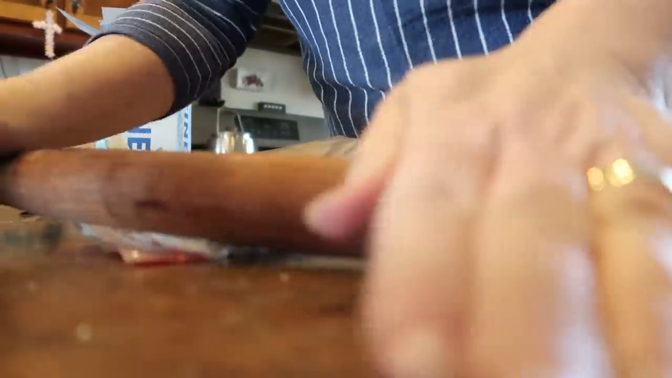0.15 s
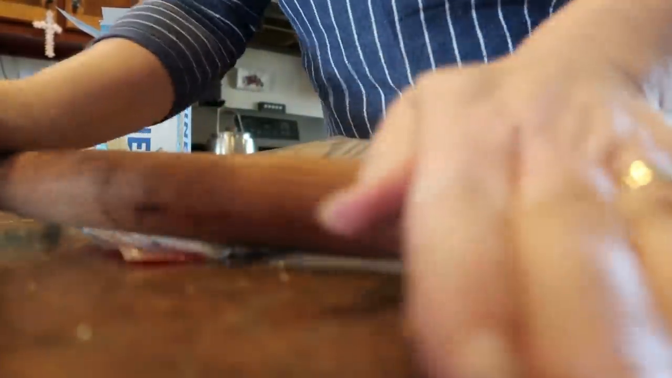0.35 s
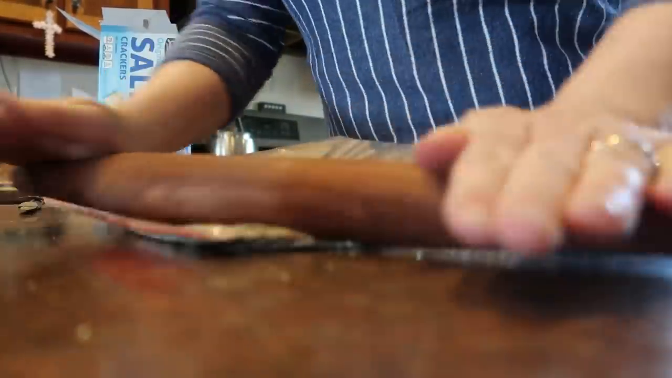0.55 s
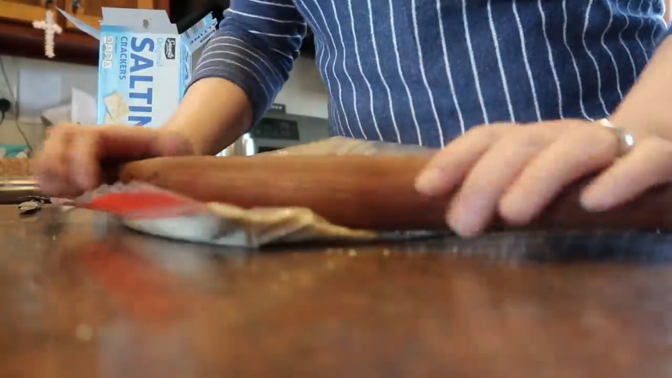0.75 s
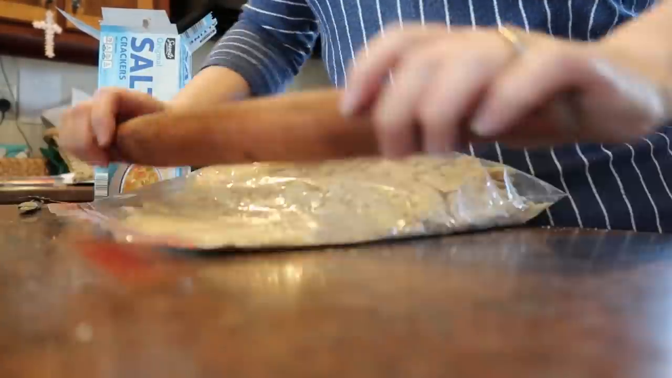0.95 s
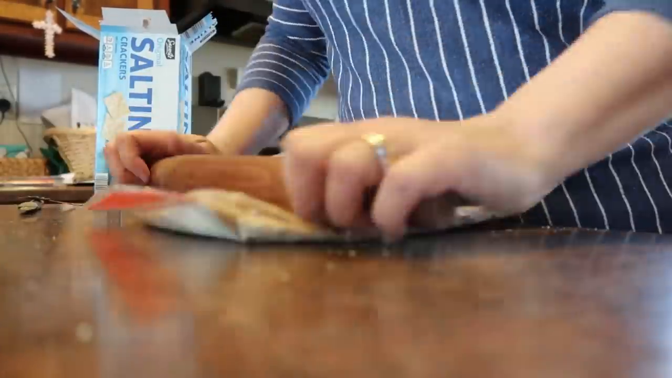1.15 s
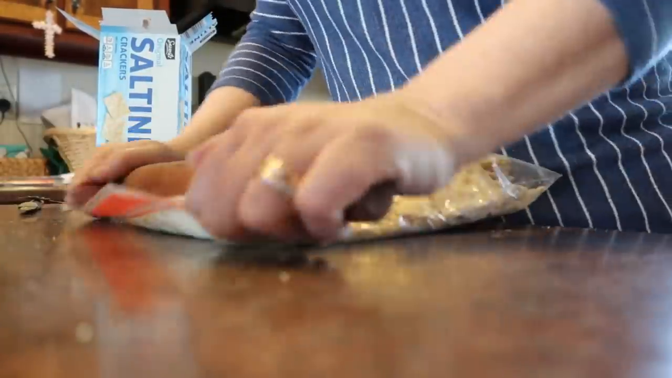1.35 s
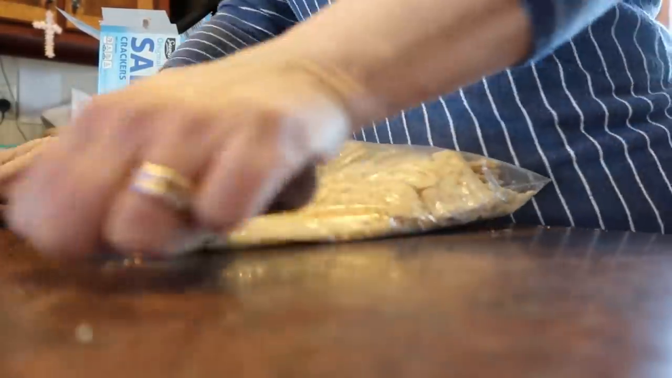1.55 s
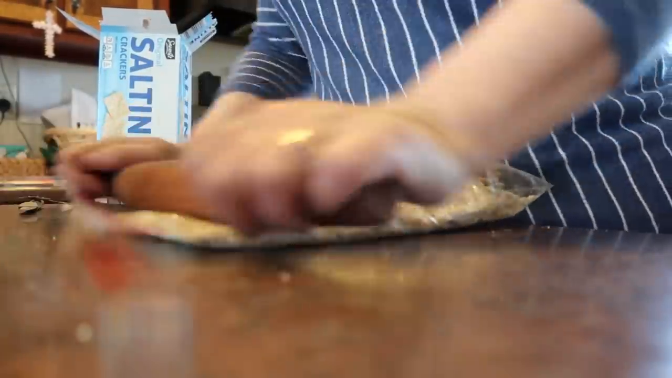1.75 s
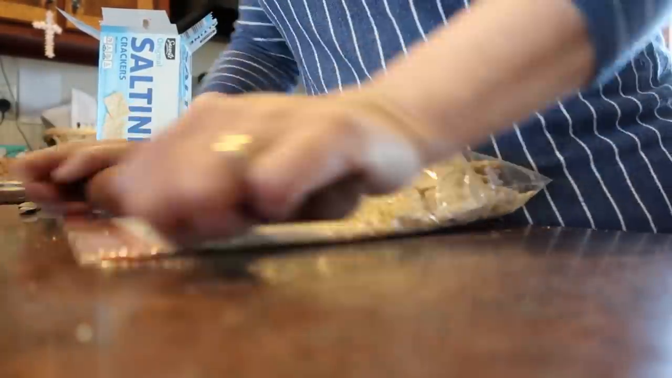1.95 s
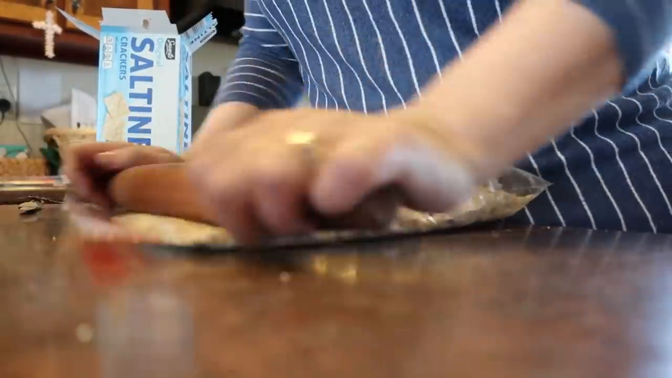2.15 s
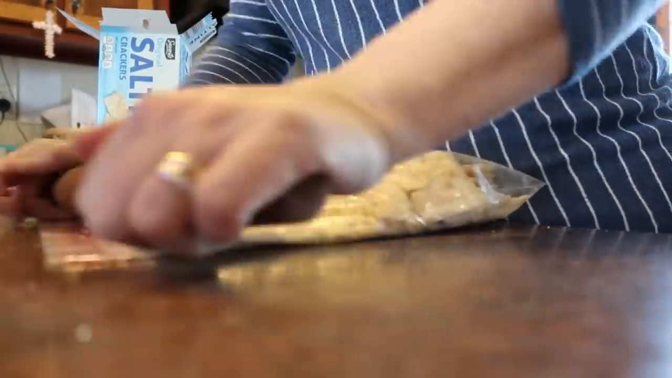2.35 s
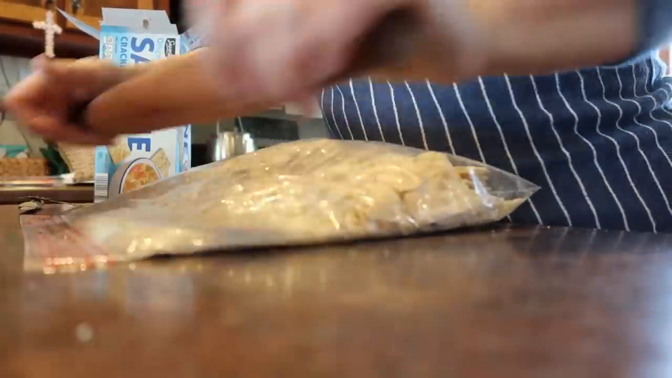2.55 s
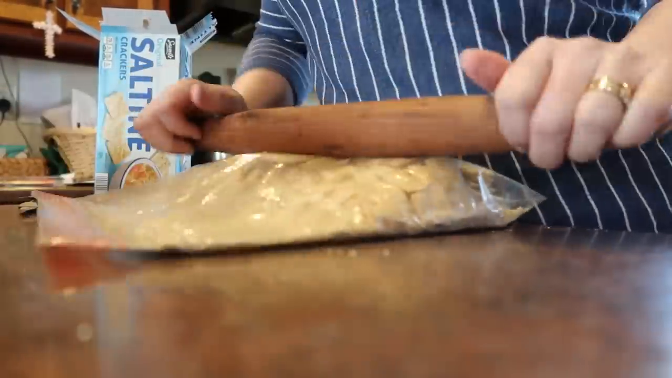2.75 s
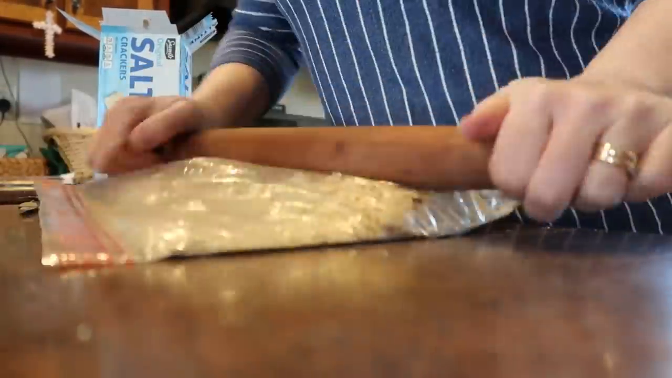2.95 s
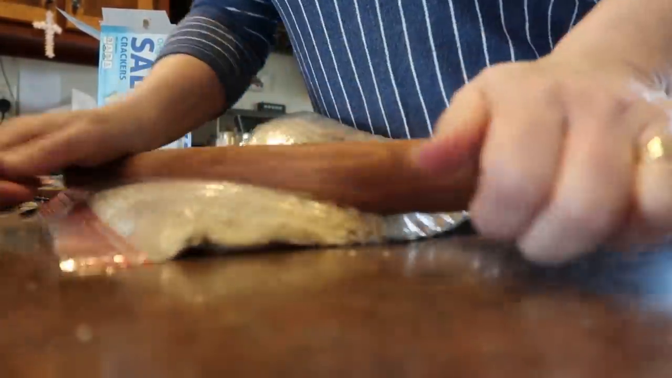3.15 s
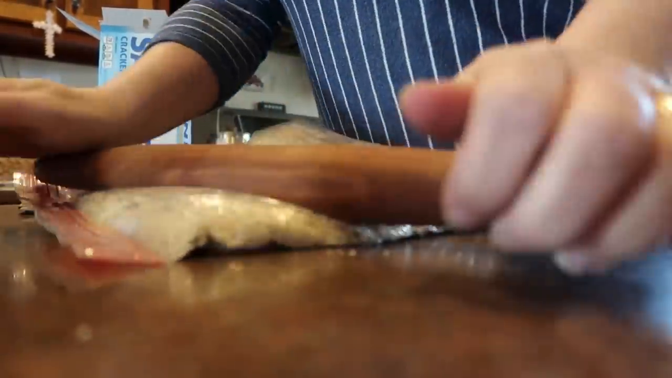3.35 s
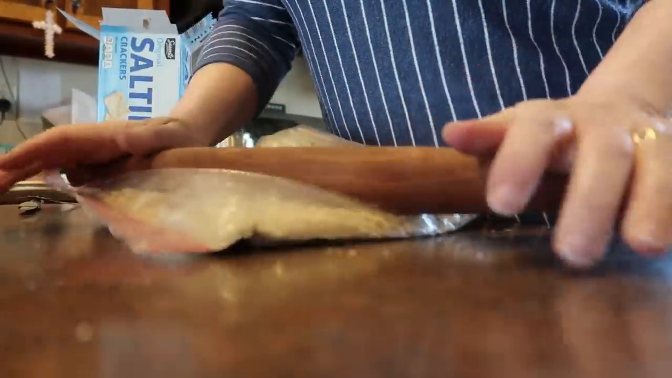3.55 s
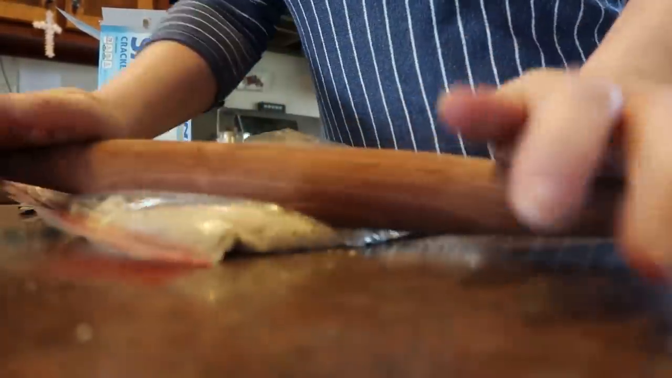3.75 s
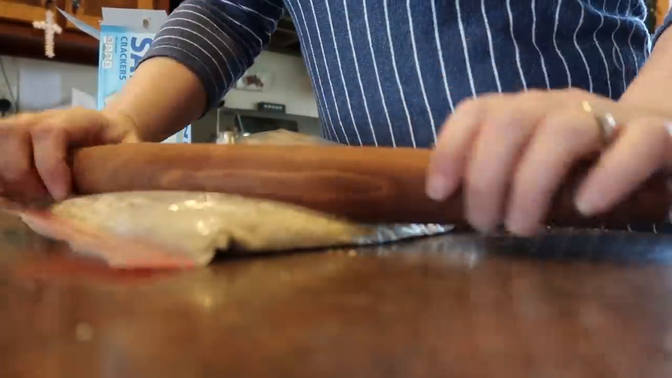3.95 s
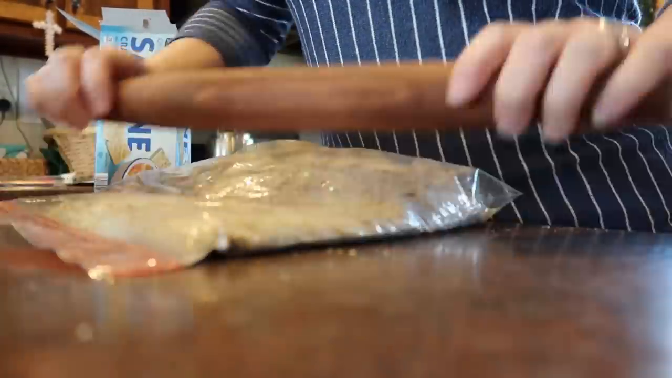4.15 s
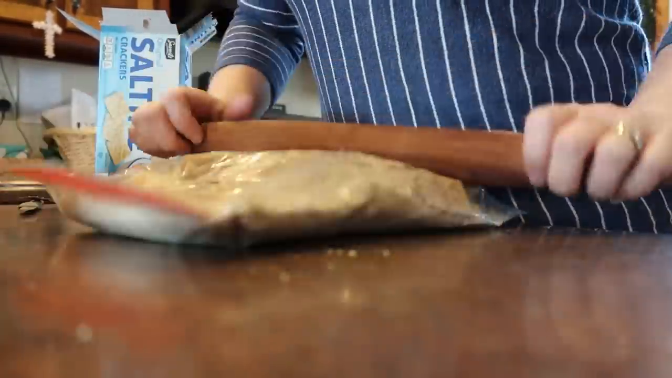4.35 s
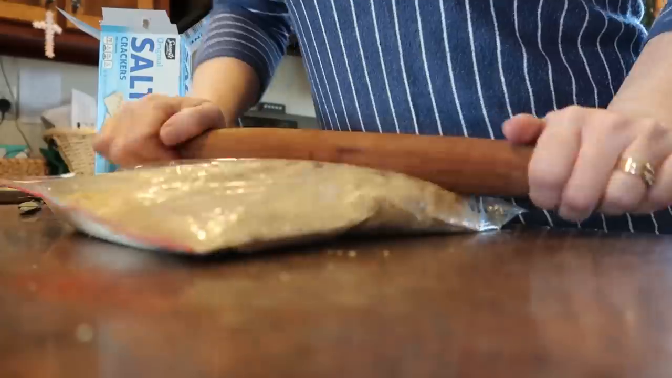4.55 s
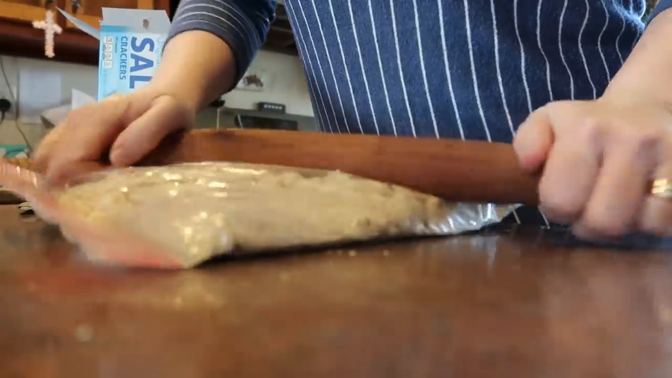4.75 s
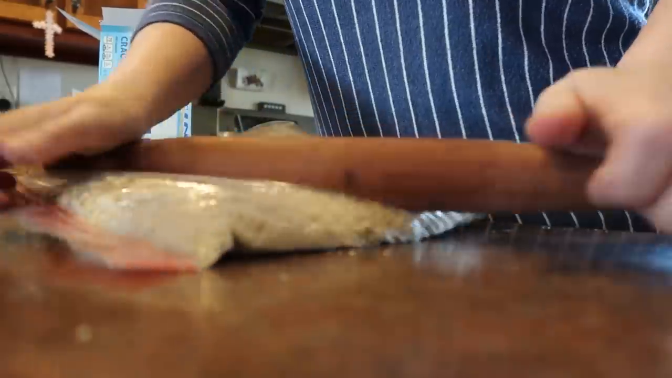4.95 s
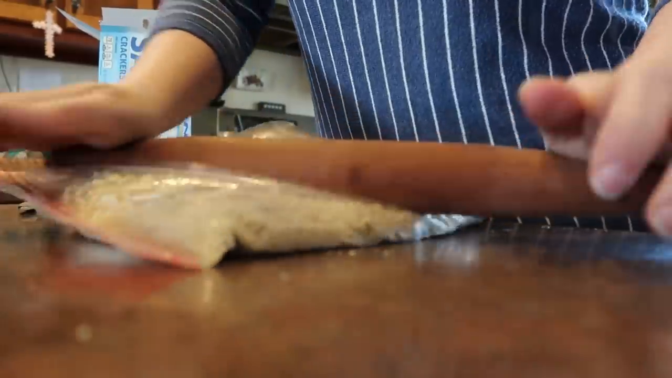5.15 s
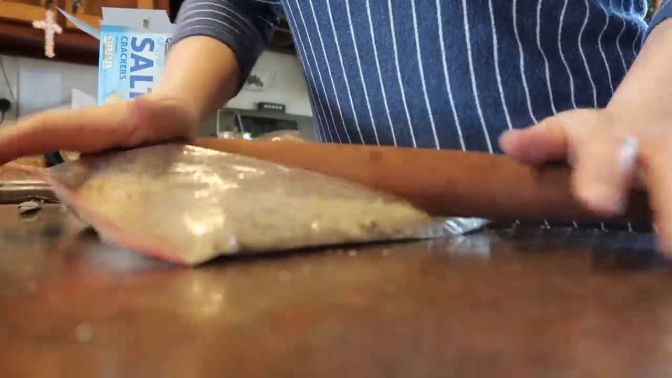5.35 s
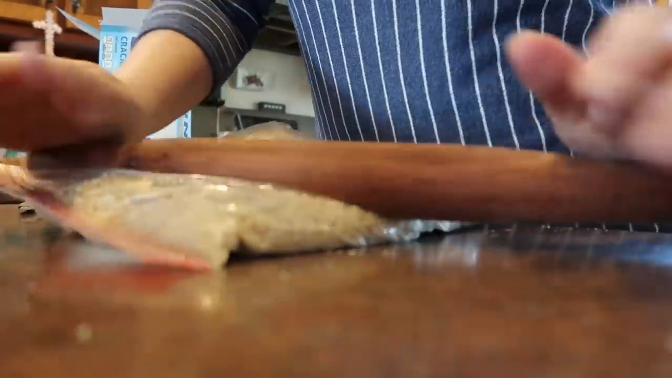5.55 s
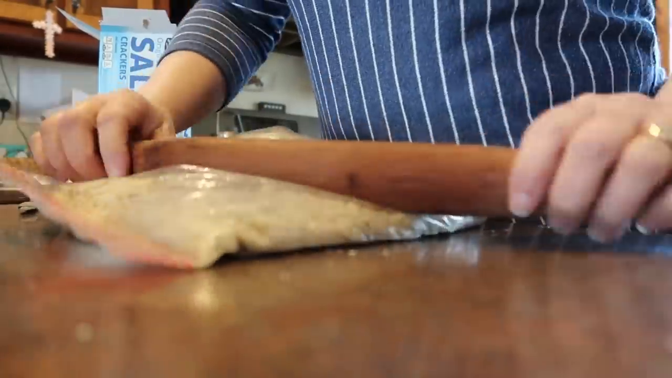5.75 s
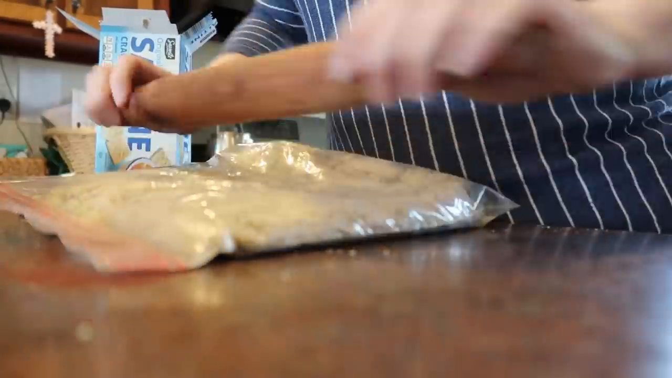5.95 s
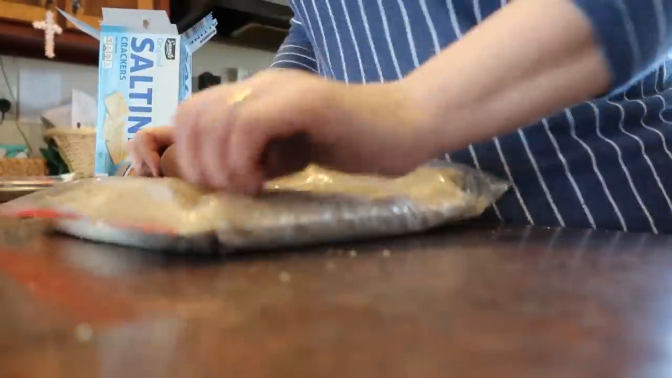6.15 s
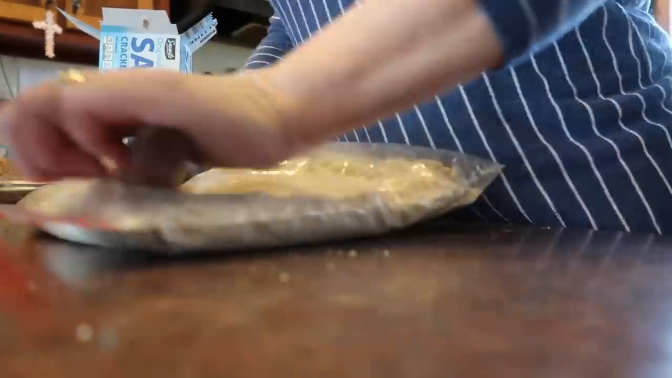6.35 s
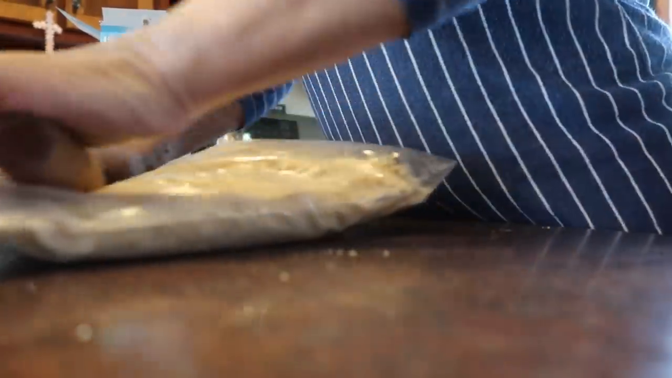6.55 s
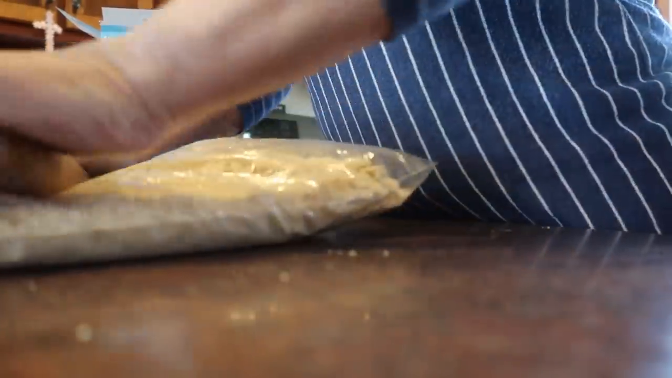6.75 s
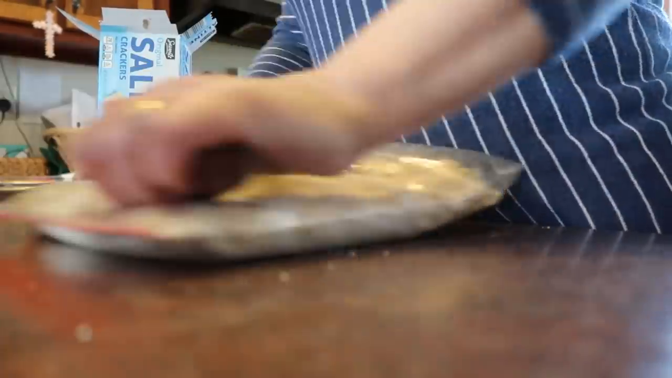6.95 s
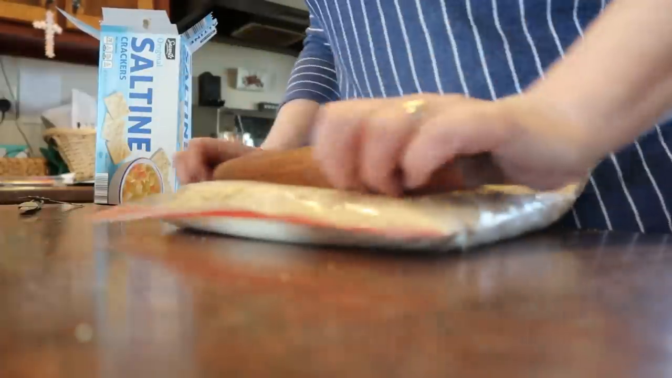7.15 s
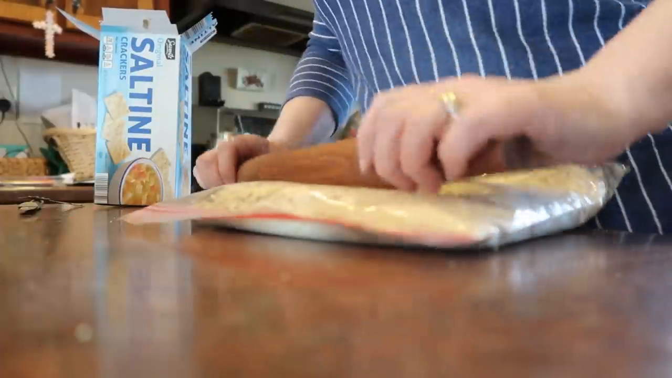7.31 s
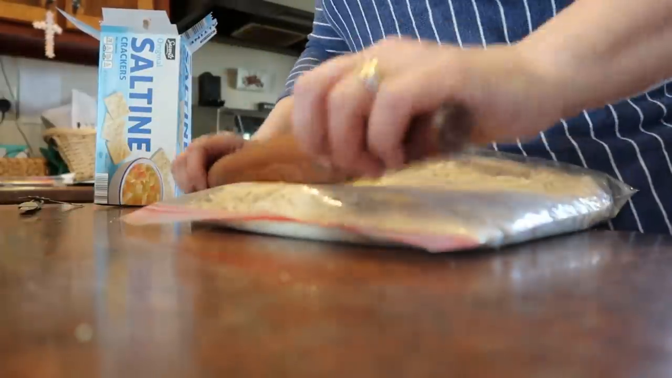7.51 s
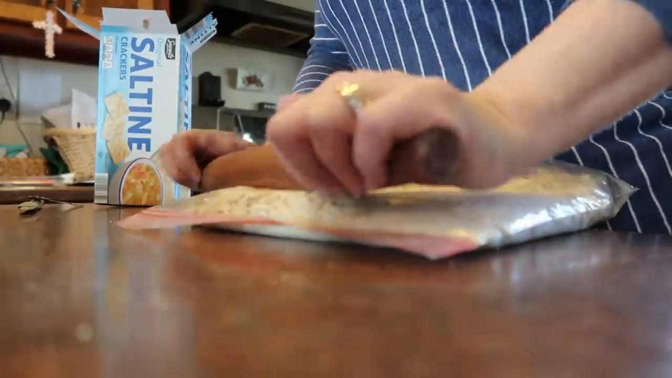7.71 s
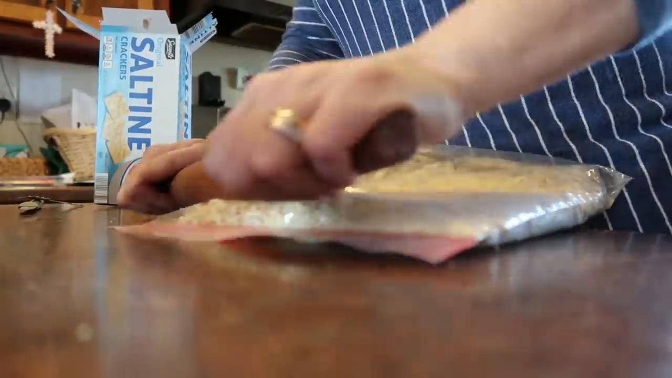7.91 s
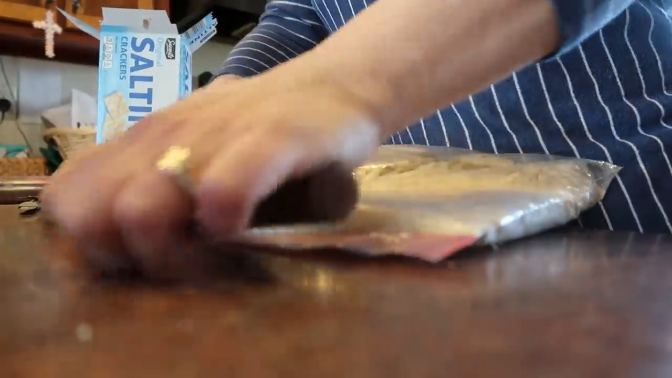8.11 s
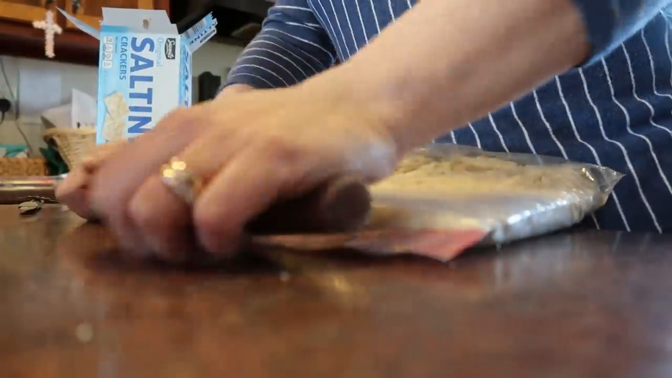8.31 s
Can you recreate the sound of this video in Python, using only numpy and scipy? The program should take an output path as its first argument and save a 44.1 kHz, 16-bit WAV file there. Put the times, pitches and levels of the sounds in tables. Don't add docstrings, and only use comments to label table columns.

```python
import sys
import numpy as np
from scipy import signal
from scipy.fft import rfft, irfft, next_fast_len
from scipy.io import wavfile

SR = 44100
rng = np.random.default_rng(int(sys.argv[2]) if len(sys.argv) > 2 else 0)


def wav_out(sig):
    wavfile.write(sys.argv[1], SR, np.round(np.clip(np.atleast_2d(sig).T, -1, 1) * 32767).astype(np.int16))


def gain_from_decibels(decibels):
    exponent = np.asarray(decibels, float) / 20
    return 10 ** exponent


N = 373923


def rms_one(x):
    return x / np.sqrt(np.mean(x ** 2) + 1e-20)


def power_db(power):
    return 10 * np.log10(power)


def in_time(rows):
    s, *columns = np.transpose(rows)
    return [np.interp(np.arange(N) / SR, s, column) for column in columns]


def colour(x, points):
    size = 4096
    hz, level_db = np.transpose(points)
    axis = np.log(np.arange(size // 2 + 1) * SR / size + 1)
    cepstrum = irfft(np.log(gain_from_decibels(np.interp(axis, np.log(hz), level_db))))
    cepstrum[1:size // 2] *= 2
    cepstrum[size // 2 + 1:] = 0
    response = irfft(np.exp(rfft(cepstrum)))
    return rms_one(signal.oaconvolve(x, response)[:N])


def steep(x, hz, kind):
    return signal.sosfilt(signal.cheby2(8, 50, hz, kind, fs=SR, output="sos"), x)


def soft_low(x, hz):
    return signal.sosfilt(signal.butter(2, hz, fs=SR, output="sos"), x)


def high_shelf(x, gain, hz):
    low = soft_low(x, hz)
    return low + gain * (x - low)


def drift(rate_hz):
    r = np.exp(-2 * np.pi * rate_hz * 20 / SR)
    noise = rng.standard_normal(N // 20 + 2002)
    slow = signal.lfilter([1], [1, -2 * r, r * r], noise)[2000:]
    return np.interp(np.arange(N) / 20, np.arange(len(slow)), rms_one(slow))


def ring(clicks, hz, t60):
    r, w = gain_from_decibels(-60 / (t60 * SR)), 2 * np.pi * hz / SR
    return signal.lfilter([0, np.sin(w)], [1, -2 * r * np.cos(w), r * r], clicks + 1e-18)


def random_signs(breaks):
    return breaks * rng.choice([-1, 1], N)


def strikes(table):
    clicks = np.full(N, 1e-18)
    rows = np.array(table)
    clicks[(rows[:, 0] * SR).astype(int)] = gain_from_decibels(rows[:, 1])
    return clicks


# frequency in Hz, level in dB per Hz.
AIR = [(18, -79), (30, -37), (75, -6), (147, -15.5), (312, -11.5), (716, -21), (859, -26.5), (3500, -26),
       (7830, -41), (8920, -11.5), (15000, -22)]
# frequency in Hz, level in dB per Hz.
AIR_APART = [(59, -26), (100, -8), (462, -9.5), (983, -20), (1630, -20), (3460, -31), (15000, -47)]
# frequency in Hz, level in dB rms.
FRIDGE_TONES = [(120.5, -53.5), (143, -53.5), (241, -57), (726, -66)]


def room_tone():
    air = colour(rng.standard_normal(N), AIR)
    shared = steep(air, 9200, "low") + gain_from_decibels(-24) * air
    apart = high_shelf(colour(rng.standard_normal(N), AIR_APART), gain_from_decibels(12), 6000)
    t = np.arange(N) / SR
    hum = 0
    for hz, db in FRIDGE_TONES:
        hum = hum + gain_from_decibels(db + 2 + 1.5 * drift(5)) * np.sin(2 * np.pi * hz * t)
    return gain_from_decibels(-41) * shared + gain_from_decibels(-59) * apart * [[1], [-1]] + hum


def moves(table, rise_db_per_s, fall_db_per_s, bulge_db=0):
    t = np.arange(0, N + 20, 20) / SR
    power = np.full(len(t), 1e-12)
    for s, length, first_db, last_db in table:
        part = np.clip((t - s) / length, 0, 1)
        level_db = first_db + (last_db - first_db) * part + bulge_db * np.sin(np.pi * part)
        level_db -= rise_db_per_s * np.maximum(s - t, 0)
        level_db -= fall_db_per_s * np.maximum(t - s - length, 0)
        power += gain_from_decibels(2 * np.maximum(level_db - 2, -120))
    return np.interp(np.arange(N) / SR, t, power)


# start in seconds, length in seconds, crunch at start in dB, crunch at end in dB.
ROLLS = [(0.0, 0.072, -27.5, -22), (.15, 0.082, -20.5, -24), (.335, 0.024, -20, -22),
         (.45, 0.069, -23.5, -34.5), (.60, 0.21, -21, -20), (1.32, 0.16, -16, -19), (1.50, .18, -17.5, -17),
         (1.80, 0.14, -30.5, -19), (2.02, .13, -20.5, -16.5), (2.25, 0.067, -20, -21.5),
         (2.40, 0.16, -18.5, -29.5), (2.93, .39, -19, -15.5), (3.33, 0.095, -23.5, -21.5),
         (3.51, 0.056, -23, -24.5), (3.60, 0.051, -30.5, -30.5), (3.73, 0.13, -17, -18.5),
         (4.48, 0.684, -19, -16), (5.25, .13, -24.5, -18.5), (5.47, .15, -16.5, -20),
         (6.30, 0.23, -20, -18.5), (6.875, 0.086, -24, -21), (7.76, 0.38, -20.5, -17),
         (8.16, 0.12, -26.5, -27)]


def rolls():
    return moves(ROLLS, 363, 354, bulge_db=2)


# start in seconds, length in seconds, crunch at start in dB, crunch at end in dB.
DRAGS = [(.50, 0.077, -38.5, -28.5), (.88, 0.099, -32.5, -26), (1.70, 0.073, -42, -26),
         (2.55, 0.11, -38, -46.5), (3.92, 0.31, -32.5, -30), (5.66, 0.13, -35, -37), (5.82, .04, -46, -39),
         (5.88, 0.066, -35.5, -30.5), (5.95, 0.05, -33.5, -35.5), (6.58, 0.18, -26.5, -28.5),
         (7.00, 0.21, -32.5, -25.5), (7.20, 0.34, -28.5, -32.5), (7.68, 0.073, -28, -25),
         (8.33, 0.13, -43.5, -45.5)]


def drags():
    return moves(DRAGS, 510, 185)


# start in seconds, length in seconds, crunch at start in dB, crunch at end in dB.
LANDINGS = [(1.028, 0.019, -25, -31), (1.195, 0.02, -29, -18), (1.206, 0.069, -15.5, -24.5),
            (1.782, .012, -18, -21), (2.842, 0.02, -21, -13.5), (4.436, 0.018, -13, -9.5),
            (5.224, 0.023, -25, -21), (5.797, .022, -30, -32.5), (6.191, 0.063, -21, -14),
            (7.652, 0.0099, -17.5, -16), (7.730, 0.01, -15.5, -14.5)]


def landings():
    return moves(LANDINGS, 3000, 520)


def fractures(per_s, spread_db, clump_db):
    clumps = gain_from_decibels(clump_db * (drift(60) + 1.04 * drift(19)))
    sizes = gain_from_decibels(spread_db * np.minimum(rng.exponential(1, N), 3.6))
    return clumps * sizes * (rng.random(N) < per_s / SR)


def crumb_rings(breaks, cycles, fines):
    pitches = np.geomspace(500, 16000, 16)
    share = pitches ** fines / np.sum(pitches ** fines)
    dealt = np.searchsorted(np.cumsum(share), rng.random(N))
    signed = random_signs(breaks)
    total = 0
    for k, hz in enumerate(pitches):
        strength = hz / np.sqrt(share[k] * cycles)
        total = total + strength * ring(signed * (dealt == k), hz, cycles / hz)
    return rms_one(total)


def crumbs_and_flakes(breaks):
    flakes = fractures(per_s=500, spread_db=3.5, clump_db=3.5)
    crumbs = crumb_rings(breaks, cycles=3.95, fines=.6)
    return crumbs + gain_from_decibels(-10.5) * crumb_rings(flakes, cycles=18, fines=.3)


# frequency in Hz, level in dB per Hz.
CRUMBS = [(440, -9), (750, -3), (841, -4.5), (983, -1.5), (1990, 0.5), (2140, 2), (3420, -1.5),
          (4080, -3.5), (5130, -12), (8030, -21.5), (9000, -16), (11700, -6), (19800, -120)]


def crunch(crumbs, nearness, crunch_db):
    rustle_db = -12.5 + 5.5 * nearness + 0.033 * (crunch_db + 20.5)
    return high_shelf(colour(crumbs, CRUMBS), gain_from_decibels(rustle_db + 8.0), 2750)


# frequency in Hz, level in dB per Hz.
SIZZLE = [(9500, -60), (11600, -2), (12500, 0), (14200, -3), (15100, -10), (15700, -60)]


def sizzle(crumbs, askew, crunch_db):
    sizzle_db = -18.5 - 40 * askew
    return gain_from_decibels(crunch_db + sizzle_db + 3.4 * drift(14)) * colour(crumbs, SIZZLE)


# frequency in Hz, level in dB per Hz.
CRUMBS_APART = [(88, -37), (150, -27), (320, 4), (530, -12), (1340, 0.5), (2020, -16), (4220, 3),
                (7270, -7), (11100, -5.5), (13800, -14.5), (15500, -36)]


def port_difference(near, breaks, askew, nearness, crunch_db):
    lag = -.8 * askew
    slope = soft_low(np.gradient(near), 5000)
    scattered = colour(crumb_rings(breaks, cycles=7.0, fines=.7), CRUMBS_APART)
    scattered_db = crunch_db - 15 + 5.5 * nearness
    return gain_from_decibels(-36.5) * near - 0.76 * lag * slope + gain_from_decibels(scattered_db) * scattered


# frequency in Hz, level in dB, time to fall 60 dB in seconds.
PRESSED_PIN = [(509, 0.5, 0.038), (830, -2.5, 0.041), (1185, -7, 0.02), (1600, -6, 0.041)]


def pin_hum(breaks, nearness, weight_db):
    hum = sum(gain_from_decibels(db) * ring(random_signs(breaks), hz, t60) for hz, db, t60 in PRESSED_PIN)
    return gain_from_decibels(-32.5 + 24.5 * nearness + 1.6 * weight_db) * rms_one(hum)


# frequency in Hz, level in dB, time to fall 60 dB in seconds.
TABLE_TOP = [(75, -12, 0.09), (91.5, -15, 0.046), (188.5, -6.5, 0.23), (243, -6, 0.1), (317, -4.5, 0.067),
             (434.7, -4, 0.072), (527, 3, 0.047), (602.4, -6.5, 0.13), (776, -25, .07)]
# start in seconds, peak in dB.
KNOCKS = [
    (1.193, -45),
    (1.282, -10),
    (1.731, -7.5),
    (2.839, -15.5),
    (4.432, -14),
    (6.195, -20),
    (7.652, -26),
    (8.296, -4.5),
]


def table_top(breaks, boom_db, knock_db):
    boom, knock = 0, 0
    for hz, db, t60 in TABLE_TOP:
        pushes = signal.lfilter([1], [1, -.85], random_signs(breaks))
        mode = gain_from_decibels(db + 2.0 * drift(2.84)) * ring(pushes, hz, 0.62 * t60)
        if hz > 240:
            knock = knock + mode
        else:
            boom = boom + mode
    blows = signal.lfilter([.01], [1, -1.8, .81], strikes(KNOCKS))
    struck = sum(gain_from_decibels(db - 9.0) * ring(blows, hz, t60) for hz, db, t60 in TABLE_TOP)
    return gain_from_decibels(boom_db - 3.0) * rms_one(boom) + gain_from_decibels(knock_db - 2.5) * rms_one(knock) + struck


def small_snaps(roll_db):
    chance = rng.random((200, 3))
    s = np.cumsum(-np.log(chance[:, 0])) / 3.1
    kept = s < N / SR
    level_db = roll_db[(s[kept] * SR).astype(int)] + 10.5 + 6 * (chance[kept, 1] - .5)
    pitch_hz = 1100 * gain_from_decibels(7.3 * chance[kept, 2])
    return list(zip(s[kept], level_db, pitch_hz))


def snaps(table):
    out, chance = np.zeros(N + 900), rng.random((len(table), 6))
    t = np.arange(300) / SR
    run = [(0, -0.5), (.0012, 1), (.0025, -29)]
    for (s, db, hz), c in zip(table, chance):
        for k, (lag, crack_db) in enumerate(run):
            pitch = hz * (0.97 + 0.2 * k * c[k])
            envelope = gain_from_decibels(-60 * t * pitch / 9.6) * np.minimum(t * pitch / 1.2, 1)
            crack = np.sin(2 * np.pi * pitch * t) * envelope
            at = int((s + lag * (0.624 + c[k + 3])) * SR)
            out[at:at + 300] += gain_from_decibels(db + crack_db + 1.5) * crack
    return out[:N]


# start in seconds, peak in dB, pitch in
# Hz.
POPS = [(0.0663, -9, 1600), (0.1487, -16, 2480), (0.1642, -4, 2550), (0.33, -15, 1570), (0.9487, -18, 1170),
        (1.0475, -7.5, 2360), (2.0457, -13, 2060), (2.1311, -3.5, 1650), (2.2483, -21, 1180),
        (3.3992, -3, 2550), (3.5342, -13.5, 1030), (3.6052, -16, 1280), (3.678, -15, 2320),
        (4.5895, -5, 1410), (5.256, -2.5, 3430), (5.7984, -23, 2200), (5.9502, -13, 1920),
        (7.4704, -14.5, 2170), (7.532, -12, 1790), (7.5697, -25, 1440), (7.9698, -3, 2090),
        (8.2215, -5, 3050), (8.2335, -7, 3800), (8.2478, -11, 2250)]
# start in seconds, peak in dB, pitch
# in Hz.
SNAPS = [(0.3401, -23, 2300), (1.0285, -10, 1640), (1.2104, -5, 1110), (1.3157, -2.5, 1510),
         (1.6576, -1.5, 2500), (1.7848, -11, 1970), (2.84, -9, 1190), (2.9184, -18, 2890),
         (3.055, -0.5, 1440), (3.724, -14, 3030), (4.4343, -2, 1050), (4.615, -7, 1420), (4.799, 0, 1670),
         (4.8449, -6, 2790), (4.9665, 1.5, 2110), (5.0265, -1, 2380), (5.222, -12, 3030),
         (5.4765, -2.5, 1300), (5.87, -20, 2260), (6.1953, -7, 1120), (6.2954, -8, 1460),
         (6.9433, -7.5, 2020), (7.1551, -16, 1270), (7.651, -11, 1020), (7.7323, -20, 2360),
         (7.8456, -6.5, 1790), (7.9336, 1, 2030), (8.003, -4, 1570), (8.1363, 4.5, 2520),
         (8.2043, -6.5, 3300),
         (8.1396, 5.5, 3340),
]


def pops_and_snaps(roll_db):
    pieces = SNAPS + POPS + small_snaps(roll_db)
    edges = colour(strikes(pieces), CRUMBS)
    return gain_from_decibels(-1.0) * snaps(pieces) + gain_from_decibels(-39.5) * edges


# start in seconds, peak in dB.
SWAYS = [
    (1.20, -23),
    (2.845, -21.5),
    (4.44, -20.5),
    (6.20, -28),
    (7.66, -24.5),
]


def sway():
    push = np.hanning(int(0.042 * SR / 2))
    pushes = signal.oaconvolve(strikes(SWAYS), 2 * push / push.sum())[:N]
    return ring(pushes, hz=54.4, t60=0.49)


# start in seconds, peak in dB.
RING_TAPS = [
    (5.8706, -8.5),
]
# frequency in Hz, level in dB, time to fall 60 dB in seconds.
FREE_PIN = [(1150, -7, .06), (1420, -10, .03), (2260, -2, .045), (2430, -2, .05), (3700, -6, .02)]


def ring_taps():
    taps = steep(strikes(RING_TAPS), 6000, "low")
    return sum(gain_from_decibels(db - 7) * ring(taps, hz, t60) for hz, db, t60 in FREE_PIN)


def kitchen(x):
    size = next_fast_len(N + SR)
    hz = np.arange(size // 2 + 1) * SR / size
    t60 = 0.35 / (1 + hz / 6000)
    echoes = np.zeros((2, size // 2 + 1), complex)
    for k, lag in enumerate(rng.uniform(.009, .035, 12)):
        loop = gain_from_decibels(-60 * lag / t60) * np.exp(-2j * np.pi * hz * lag)
        echoes[k % 2] += (-1) ** (k // 2) * loop / (1 - loop)
    both = irfft(echoes * rfft(x, size), size)[:, :N]
    return 0.38 * both.mean(axis=0) + 0.12 * both


# time in seconds, askew to the ports from 0 to 1, nearness from 0 to 1,
# weight in dB.
GRIP = [(0, 0.14, 1.0, 3), (.8, 0.24, 0.78, 5), (1.05, .3, 0, -3.5), (1.25, .5, 0.44, 3),
        (2.5, 0.63, 0.17, 0.5), (2.8, 0.24, 0.61, 0.5), (4.3, 0.27, 0.26, -1.5), (5.9, 0.3, 0.05, -3),
        (6.27, 0.4, 0, 3.5), (6.32, 0.7, 0, 3.5), (6.95, 1, 0, -0.5), (7.1, .05, 0.68, 3),
        (7.55, 0.4, 0, 4), (7.7, 0.57, 0, -1), (8.05, 0.5, 0.57, -5.5), (8.48, .2, 1, 3.5)]


def scene():
    askew, nearness, weight_db = in_time(GRIP)
    roll, landing, drag = rolls(), landings(), drags()
    crunch_db = power_db(roll + landing + drag)
    boom_db = weight_db + power_db(gain_from_decibels(2 * -7) * roll + gain_from_decibels(2 * -15.5) * landing + gain_from_decibels(2 * -15) * drag)
    knock_db = weight_db + power_db(gain_from_decibels(2 * -4) * roll + gain_from_decibels(2 * -4) * landing + gain_from_decibels(2 * -6.5) * drag)

    breaks = fractures(per_s=4000, spread_db=1.0, clump_db=1.1)
    crumbs = crumbs_and_flakes(breaks)
    crushing = crunch(crumbs, nearness, crunch_db) + pin_hum(breaks, nearness, weight_db)
    near = gain_from_decibels(crunch_db + 1.0) * crushing + pops_and_snaps(power_db(roll)) + ring_taps()
    near += table_top(breaks, boom_db, knock_db) + sway()
    near = steep(near, 10130, "low")

    apart = port_difference(near, breaks, askew, nearness, crunch_db)
    direct = near + sizzle(crumbs, askew, crunch_db) + apart * [[1], [-1]]
    return direct + gain_from_decibels(-14.5) * kitchen(near) + room_tone()


def band_limit(x):
    return signal.sosfilt(signal.butter(12, 15760, fs=SR, output="sos"), x)


def record(dry):
    thin = signal.sosfilt(signal.butter(2, 45, "high", fs=SR, output="sos"), dry)
    limited = thin / (1 + thin ** 6) ** (1 / 6)
    return band_limit(limited)


dry = scene()
out = record(dry)
wav_out(out)
```